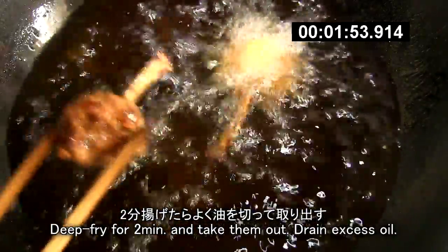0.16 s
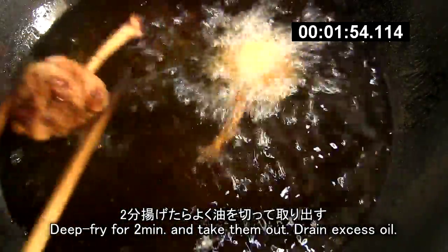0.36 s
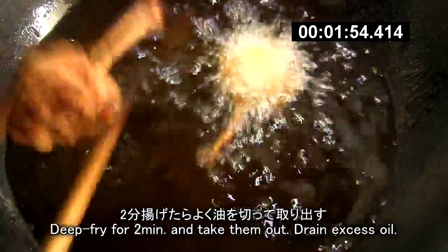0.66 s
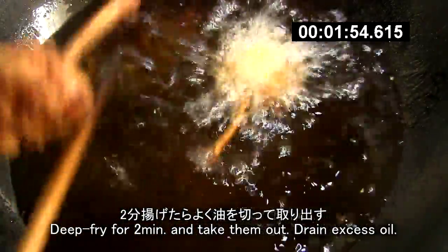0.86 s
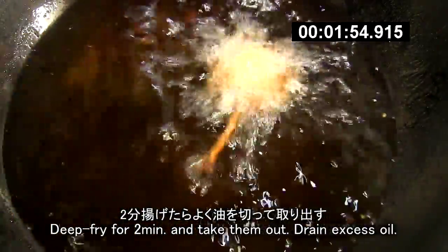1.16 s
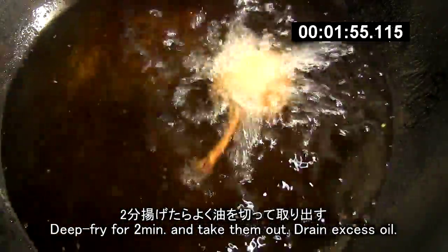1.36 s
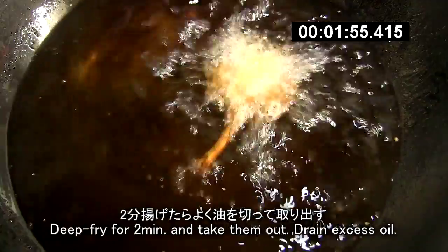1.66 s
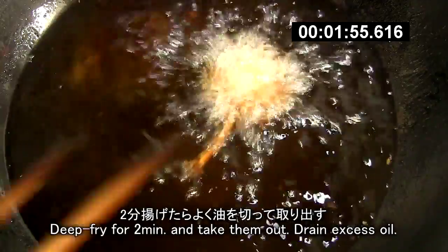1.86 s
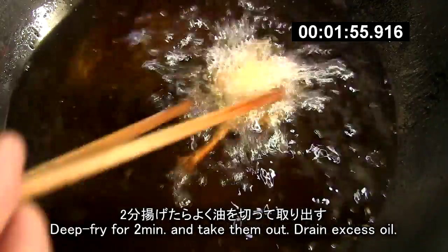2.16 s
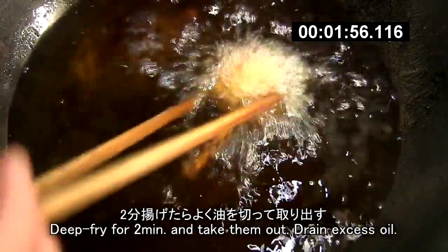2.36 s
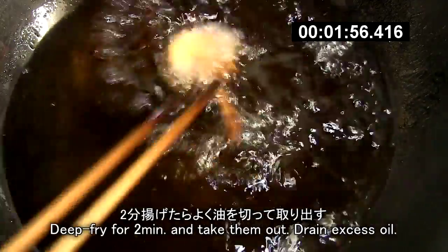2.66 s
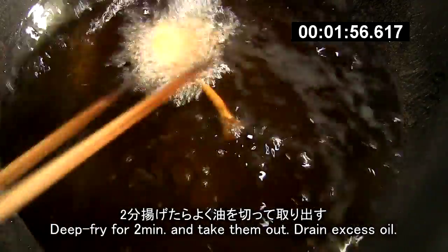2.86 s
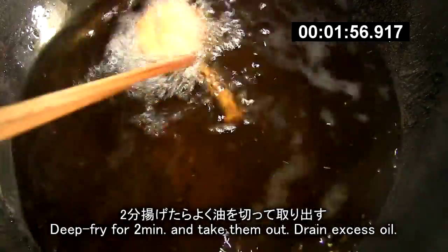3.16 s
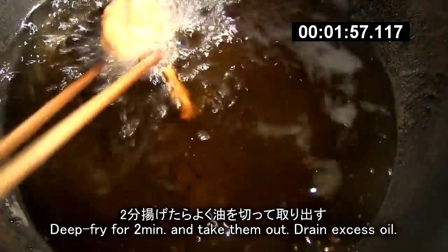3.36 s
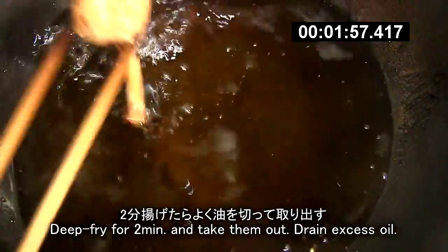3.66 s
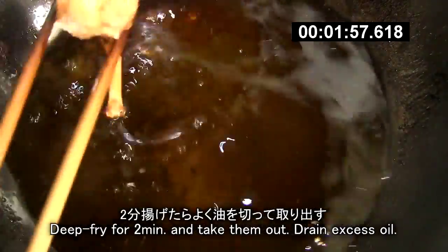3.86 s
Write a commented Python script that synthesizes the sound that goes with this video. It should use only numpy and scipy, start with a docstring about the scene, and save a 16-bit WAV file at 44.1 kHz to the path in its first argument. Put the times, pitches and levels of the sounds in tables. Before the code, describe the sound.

Chicken sizzles in deep hot oil, lively with pops and snaps at first, then calmer, then spitting again. Close stereo microphone in a small kitchen, with short metallic echoes from the pan.

```python
"""Fine bubbles fizz and simmer as chicken deep-fries in a pan of hot oil in a small kitchen.
Water escaping from the meat bursts in steam pops (clusters of decaying sines plus a noise crack)
and dry snaps (sub-millisecond clicks); a few large bubbles ring single rising notes.
Early on, a piece is set down with soft bumps of filtered noise and a knock of decaying partials.
Fizz and low plips are random swarms of bubble grains; simmer and hiss are shaped noise."""
import sys
import numpy as np
from scipy import signal
from scipy.io import wavfile
from scipy.ndimage import uniform_filter1d

SR = 44100
rng = np.random.default_rng(int(sys.argv[2]) if len(sys.argv) > 2 else 0)


def digitize_waveform(pressure):
    """Quantize a signal to 16-bit integers and store it at the path in sys.argv[1].

    Rows of a 2-D input are taken as channels; values are limited to [-1, 1].
    """
    field = np.atleast_2d(pressure).T
    bounded = np.clip(field, -1, 1)
    quanta = np.round(bounded * 32767).astype(np.int16)
    wavfile.write(sys.argv[1], SR, quanta)


N = 176400  # samples

SNAP_WET_DB = -4  # echo energy of snaps and crackle, re direct sound


def amp(db):
    """Amplitude factor of a level in dB."""
    return 10 ** (np.asarray(db) / 20)


def unit(x):
    """Scales to an RMS of 1."""
    return x / np.sqrt(np.mean(x ** 2) + 1e-20)


def read(points, hz):
    """Interpolates a (Hz, value) table on a log-frequency axis."""
    f, value = np.transpose(points)
    return np.interp(np.log(hz + 1), np.log(f + 1), value)


def level_curve(points):
    """Amplitude-free dB curve over the scene from (seconds, dB) points."""
    return np.interp(np.arange(N) / SR, *np.transpose(points))


def add(mix, start_s, sound):
    """Adds a stereo sound in place, cut at the end of the mix."""
    part = mix[:, max(round(start_s * SR), 0):][:, :sound.shape[1]]
    part += sound[:, :part.shape[1]]


def seconds(length_s):
    """Time axis in seconds."""
    return np.arange(int(length_s * SR)) / SR


def band(x, low_hz, high_hz, order=2):
    """Causal Butterworth band-pass."""
    high_hz = min(max(high_hz, low_hz * 1.1), SR * .48)
    sos = signal.butter(order, [low_hz, high_hz], "band", fs=SR, output="sos")
    return signal.sosfilt(sos, x)


def bubble(t, hz, cycles):
    """A bubble rings from t = 0, falling to 1/e in the given number of cycles."""
    t = np.maximum(t, 0)
    return np.sin(2 * np.pi * hz * t) * np.exp(-t * hz / cycles)


def widen(z, hz):
    """Mixes two unrelated spectra into left and right with a set likeness at each frequency."""
    # Left-right likeness. Each row: frequency in Hz, correlation from 0 to 1.
    likeness = [(60, 0.068), (300, 0.73), (1200, 0.4), (2500, 0.11), (5000, 0.67), (9000, 0.86), (14000, 1)]
    same = np.clip(read(likeness, hz), 0, 1)[:, None]
    mid = np.sqrt((1 + same) / 2) * z[0]
    side = np.sqrt((1 - same) / 2) * z[1]
    return np.array([mid + side, mid - side])


def room(x, wet_db):
    """Direct sound plus dense random echoes from pan walls and stove recess, new for each call."""
    # Decay of the echoes. Each row: frequency in Hz, T60 in seconds.
    echo_decay = [(200, 0.16), (1900, 0.14), (3500, 0.18), (6000, 0.17), (9000, 0.085), (16000, 0.16)]
    t = seconds(.3)
    onset = np.minimum(t / 0.00094, 1)
    taps = rng.standard_normal((2, len(t))) * (rng.random(len(t)) < .15) * onset
    hz, at_s, z = signal.stft(taps, SR, nperseg=256)
    decay = amp(-60 * at_s / read(echo_decay, hz)[:, None])
    tail = signal.istft(widen(z, hz) * decay, SR, nperseg=256)[1]
    tail *= amp(wet_db) / np.sqrt((tail ** 2).sum() / 2)
    tail[:, 0] += 1  # direct sound
    return signal.fftconvolve(x[None], tail, axes=1)


def pop(db, low_hz, high_hz):
    """A pocket of steam cracks open and sheds ringing bubbles of several sizes."""
    count, spread_s, crack_db, wet_db = 9, .004, -8, 2
    t = seconds(.04)
    place = rng.random(count)
    delay_s = rng.exponential(spread_s, count)
    delay_s -= delay_s.min()
    pitches_hz = low_hz * (high_hz / low_hz) ** ((np.arange(count) + place) / count)
    # bubbles of like size ring for more cycles
    cycles = 1.88 / max(np.log(high_hz / low_hz), .25)
    rings = sum(bubble(t - d, hz, cycles) * (hz / low_hz) ** 0.91
                for hz, d in zip(pitches_hz, delay_s))
    rings = band(rings, low_hz * 0.91, high_hz * 1.71, order=3)
    crack = band(rng.standard_normal(len(t)) * np.exp(-t / 0.0094), low_hz, 6870)
    sound = room(unit(rings) + amp(crack_db) * unit(crack), wet_db)
    body = sound[:, :int(.024 * SR)]  # sets the level of each channel
    return amp(db) * sound / np.std(body, axis=1, keepdims=True)


def pops():
    """Steam pops excite the pan, whose modes ring on as decaying cosines."""
    # Steam pops. Each row: start in seconds, level in dB before pan ring and balance,
    # lowest and highest bubble pitch in Hz.
    steam_pops = [(0.1395, -12, 4830, 6700), (0.163, -20.5, 1880, 3100), (0.174, -18, 2880, 5930),
                  (0.2203, -18, 1700, 4130), (0.2378, -17.5, 2500, 3700), (.252, -17.5, 3520, 6700),
                  (0.351, -19.5, 3510, 4750), (0.428, -23.5, 2440, 3280), (0.445, -24.5, 5430, 7140),
                  (0.477, -22.5, 5800, 7000), (.527, -15.5, 2630, 5800), (0.667, -21, 3000, 5750),
                  (0.796, -22.5, 5160, 6100), (0.852, -23, 3330, 6840), (0.9238, -16, 3230, 6200),
                  (0.979, -13, 3130, 6700), (1.129, -28.5, 3260, 7100), (1.271, -17.5, 2020, 6150),
                  (1.2999, -16.5, 1695, 2960), (1.323, -15, 3290, 3750), (1.3587, -17.5, 3670, 6700),
                  (1.413, -25.5, 5600, 8500), (1.431, -20, 2980, 5450), (1.5, -22, 5260, 7500),
                  (1.546, -25, 3760, 7740), (1.578, -23, 2730, 6150), (1.647, -29.5, 1930, 4250),
                  (1.772, -17, 3670, 5250), (1.79, -20, 2950, 4700), (2.1102, -13.5, 2740, 6400),
                  (2.224, -28.5, 4500, 7900), (2.395, -20.5, 3800, 7560), (2.4275, -16, 2950, 6300),
                  (2.6778, -13.5, 3460, 4650), (2.92, -26.5, 4570, 8060), (2.95, -14, 2630, 6200),
                  (3.027, -15, 4150, 6600), (3.058, -20.5, 1570, 2600), (3.058, -21, 3600, 7500),
                  (3.109, -22, 2830, 5800), (3.123, -23, 2920, 4900), (3.175, -15.5, 3200, 5860),
                  (3.258, -21.5, 4060, 7300), (3.49, -23.5, 3720, 7100), (3.611, -20.5, 3880, 8800),
                  (3.638, -13, 3150, 5540), (3.673, -21, 2580, 6300), (3.733, -21.5, 2480, 7200),
                  (3.826, -19.5, 3210, 3880), (3.8877, -21, 3280, 5800)]
    # Pan modes. Each row: frequency in Hz, gain at resonance in dB.
    pan_modes = [(3270, 3), (3460, -10), (3620, -7.5), (5725, -1)]
    pan_t60_s, left_over_right_db = 0.045, 1
    out, t = np.zeros((2, N)), seconds(.3)
    for start_s, *row in steam_pops:
        add(out, start_s, pop(*row))
    rate = np.log(1000) / pan_t60_s
    modes = sum(amp(db) * np.cos(2 * np.pi * hz * t) for hz, db in pan_modes)
    ring = modes * np.exp(-rate * t) * 2 * rate / SR
    out = out + signal.fftconvolve(out, ring[None], axes=1)[:, :N]
    return out * amp([[left_over_right_db / 2], [-left_over_right_db / 2]])


def snaps():
    """Droplets explode on the surface: a brief ring plus a noise burst, both sub-millisecond."""
    # Dry snaps. Each row: start in seconds, peak of the direct click in dB.
    dry_snaps = [(.052, -12), (0.0912, -5.5), (0.1194, -6), (.261, -1.5), (.313, -4), (.5565, -18),
                 (0.5758, -2.5), (.675, -1.5), (0.9557, -3.5), (1.0905, -4.5), (1.145, -7), (1.27, -6),
                 (2.0542, -5), (3.0897, -1), (3.2258, 0), (3.407, -11), (3.623, -6), (3.739, -6),
                 (3.831, -4.5)]
    ring_hz, burst_decay_s = 7340, 0.00029
    out, t = np.zeros((2, N)), seconds(.01)
    for start_s, db in dry_snaps:
        burst = 1.96 * rng.standard_normal(len(t)) * np.exp(-t / burst_decay_s)
        click = band(bubble(t, ring_hz, 0.92) + burst, 3240, 10400)
        add(out, start_s, room(amp(db) * click / abs(click).max(), SNAP_WET_DB))
    return out


def large_bubbles():
    """A large bubble rings one note, which climbs as it nears the surface."""
    # Large bubbles. Each row: start in seconds, initial direct level in dB, starting pitch in Hz,
    # rise as a share of the pitch.
    single_bubbles = [(0.172, -9, 4450, 0.011), (0.43, -19, 1486, 0.047), (2.073, -25, 2510, 0.37)]
    t60_s, rise_s, wet_db = 0.11, 0.006, -3.5
    out, t = np.zeros((2, N)), seconds(.15)
    for start_s, db, hz, rise in single_bubbles:
        pitch_hz = hz * (1 + rise * (1 - np.exp(-t / rise_s)))
        note = np.sin(2 * np.pi * np.cumsum(pitch_hz) / SR) * amp(db - 60 * t / t60_s)
        add(out, start_s, room(note, wet_db))
    return out


def handling():
    """A piece is put down: dull noise bumps, the worktop booming on, and one hollow knock."""
    # Soft bumps. Each row: start in seconds, thud RMS over its first 50 ms in dB.
    soft_bumps = [(0.749, -48), (.763, -41), (0.806, -47)]
    # Knock partials. Each row: frequency in Hz, initial level in dB before the band-pass, T60 in seconds.
    knock_partials = [(500, -36, 0.11), (696, -34, 0.021), (930, -20.5, 0.011), (1290, -12, 0.016)]
    thud_hz, thud_t60_s = (121, 360), 0.048
    boom_hz, boom_t60_s, boom_db = (112, 204), 0.85, -8.5  # dB re thud
    knock_s = .9235
    out, t = np.zeros((2, N)), seconds(.3)
    head = SR // 20
    for start_s, db in soft_bumps:
        thud = band(rng.standard_normal(len(t)) * amp(-60 * t / thud_t60_s), *thud_hz, order=5)
        boom = band(rng.standard_normal(len(t)) * amp(-60 * t / boom_t60_s), *boom_hz, order=3)
        bump = thud / np.std(thud[:head]) + amp(boom_db) * boom / np.std(boom[:head])
        add(out, start_s, room(amp(db) * bump, -4.5))
    knock = sum(amp(db - 60 * t / t60_s) * np.sin(2 * np.pi * hz * t)
                for hz, db, t60_s in knock_partials)
    add(out, knock_s, room(band(knock, 280, 4000), -3.5))
    return out


def swarm(per_s, span_hz, cycles, size_db, wet_db, tilt_db, largest, count=24):
    """Bubbles of many pitches burst at random; most are small, a few large."""
    # size_db: mean size; largest: cap in multiples of it; tilt_db: per octave; count: pitches
    out, t = np.zeros((2, N)), seconds(.02)
    for hz in np.geomspace(*span_hz, count):
        bursts = rng.random(N) < per_s / count / SR
        sizes = amp(size_db * np.minimum(rng.exponential(1, N), largest)) * bursts
        grain = unit(band(bubble(t, hz, cycles), hz * .5, hz * 1.22, order=1))
        grain = grain * amp(tilt_db * np.log2(hz / span_hz[0]))
        out += room(signal.oaconvolve(sizes, grain)[:N], wet_db)[:, :N]
    return unit(out)


def wash(spectrum):
    """Countless tiny bubbles merge into shaped noise with gently shifting spectral patches."""
    hz = np.fft.rfftfreq(1024, 1 / SR)
    a, b, c, d, patches = rng.standard_normal((N // 256 + 5, len(hz), 5)).T
    patches = uniform_filter1d(patches, size=16, axis=0)  # over frequency
    patches = unit(uniform_filter1d(patches, size=6, axis=1))  # over time
    shape_db = read(spectrum, hz)[:, None] + 2 * patches
    z = widen([a + 1j * b, c + 1j * d], hz) * amp(shape_db)
    return unit(signal.istft(z, nperseg=1024, noverlap=768)[1][:, :N])


def fizz():
    """Small bubbles, dry ticks of spray and fine hiss swell and sink with the boil."""
    # Strength of the boil. Each row: time in seconds, common gain of the three layers in dB.
    boil = [(.1, -27.5), (.4, -30), (0.969, -29.5), (1.2, -35.5), (1.7, -40), (2.3, -41), (2.5, -26),
            (2.65, -42), (2.851, -38.5), (3.05, -27), (3.35, -34.5), (3.68, -29), (4, -34)]
    # Hiss of the finest bubbles. Each row: frequency in Hz, relative density in dB per Hz.
    hiss_spectrum = [(2000, -13), (6000, 1), (11000, -3), (16000, -3.5)]
    bubbles_db, crackle_db, hiss_db = -4, -5, -6.5
    sputter_rms_db, sputter_hz = 1.5, (9, 25.2)
    bubbles = swarm(per_s=1500, span_hz=(3180, 10900), cycles=1.06, size_db=10,
                    wet_db=-3.5, tilt_db=0.0, largest=3.56)
    crackle = swarm(per_s=380, span_hz=(4200, 13000), cycles=0.61, size_db=10,
                    wet_db=SNAP_WET_DB, tilt_db=5.5, largest=0.96)
    sputter = unit(band(rng.standard_normal(N), *sputter_hz))
    boil_db = level_curve(boil) + sputter_rms_db * sputter
    layers = amp(bubbles_db) * bubbles + amp(crackle_db) * crackle + amp(hiss_db) * wash(hiss_spectrum)
    return layers * amp(boil_db)


def plips():
    """Sparser low bubbles, each dying in under a cycle."""
    level_db = -44
    return amp(level_db) * swarm(per_s=260, span_hz=(610, 1970), cycles=0.41, size_db=4,
                                 wet_db=-3, tilt_db=3.5, largest=5.9, count=10)


def simmer():
    """The whole pan simmers as a broad wash of noise."""
    # Simmer spectrum. Each row: frequency in Hz, relative density in dB per Hz.
    simmer_spectrum = [(20, -35), (78, -22), (125, -6), (190, -8.5), (350, -5), (750, 0.5), (1200, -2),
                       (2300, -0.5), (3500, 2), (5500, 0), (8000, -3), (12000, -13.5), (16000, -44)]
    # Simmer level. Each row: time in seconds, level in dB.
    simmer_level = [(.1, -28.5), (.5, -31.5), (1.1, -34), (3.1, -35), (4, -37)]
    return wash(simmer_spectrum) * amp(level_curve(simmer_level))


def scene():
    """Pops, snaps, large bubbles and handling over continuous fizz, plips and simmer."""
    events = pops() + snaps() + large_bubbles() + handling()
    return events + fizz() + plips() + simmer()


def record(dry):
    """Rounds off the loudest peaks, then low-passes."""
    ceiling, edge_hz = .88, 15950
    rounded = dry / (1 + (dry / ceiling) ** 4) ** .25
    low_pass = signal.firwin(255, edge_hz, window=("kaiser", 9), fs=SR)
    return signal.oaconvolve(rounded, low_pass[None], "same")


dry = scene()
out = record(dry)
digitize_waveform(out)
```